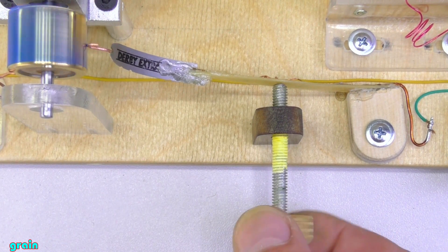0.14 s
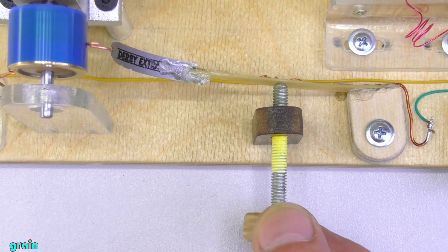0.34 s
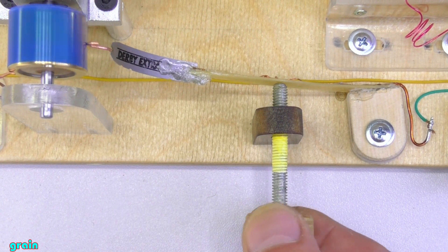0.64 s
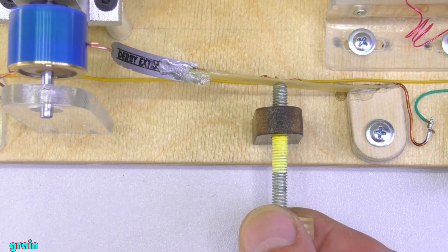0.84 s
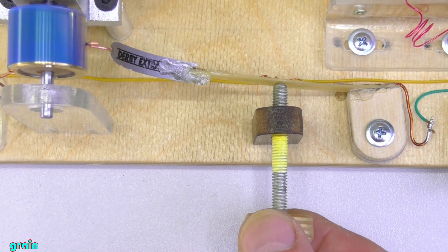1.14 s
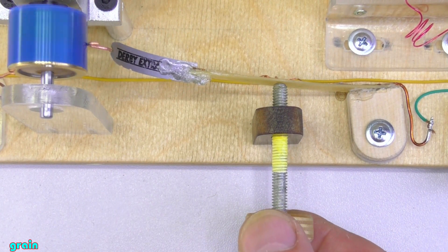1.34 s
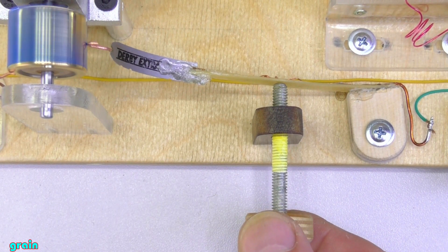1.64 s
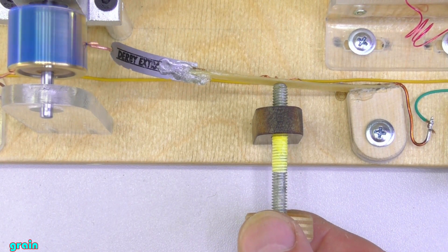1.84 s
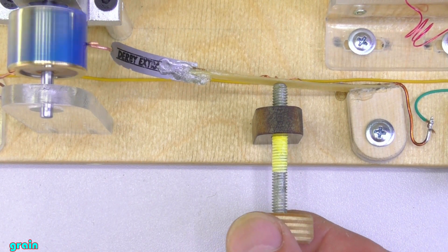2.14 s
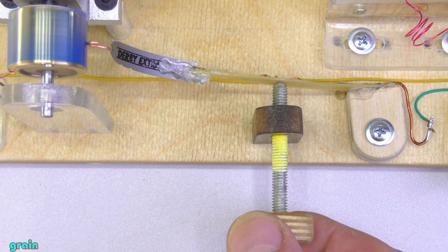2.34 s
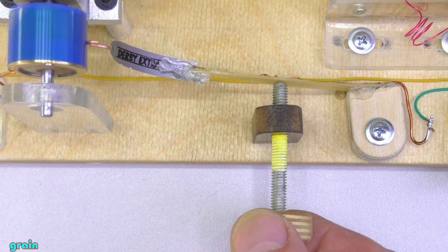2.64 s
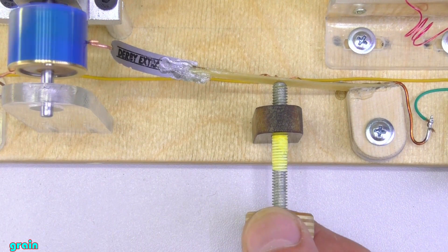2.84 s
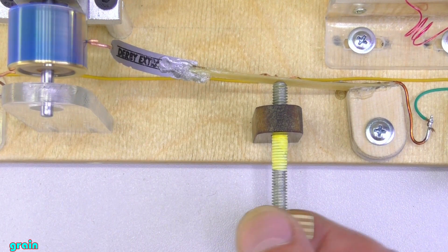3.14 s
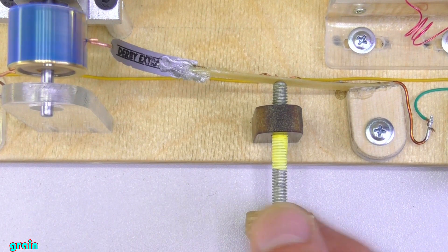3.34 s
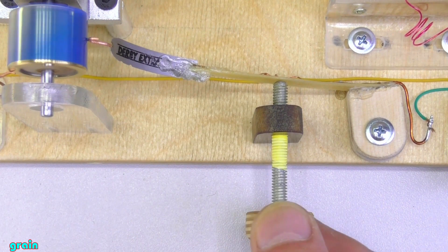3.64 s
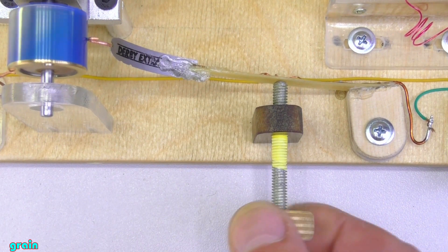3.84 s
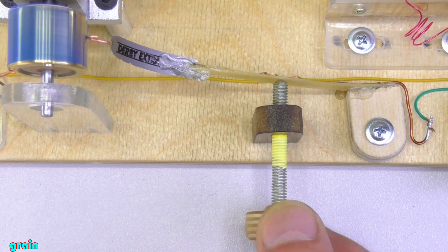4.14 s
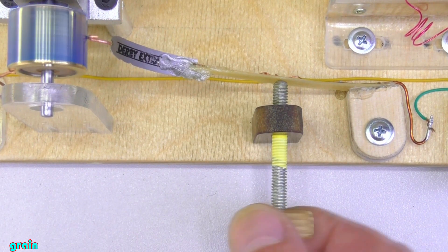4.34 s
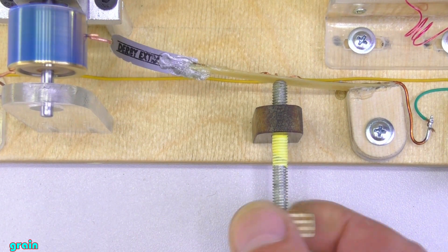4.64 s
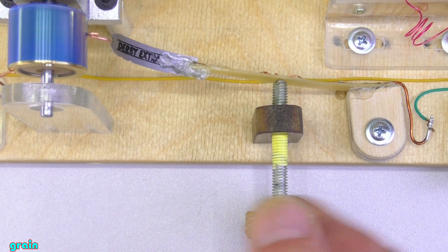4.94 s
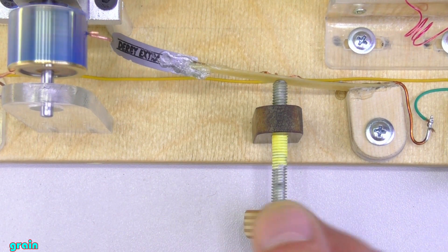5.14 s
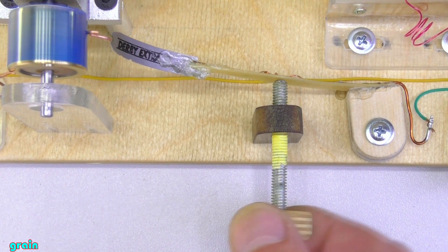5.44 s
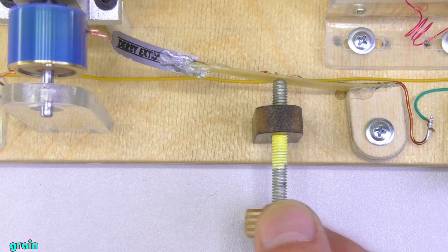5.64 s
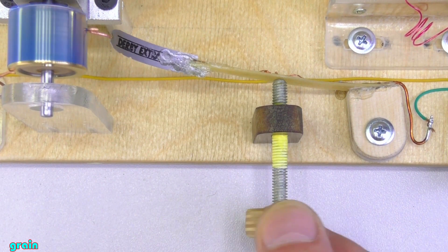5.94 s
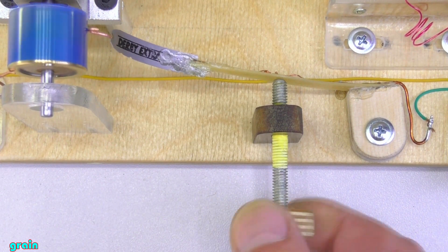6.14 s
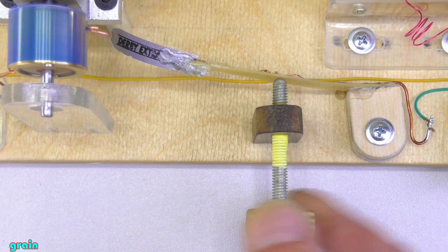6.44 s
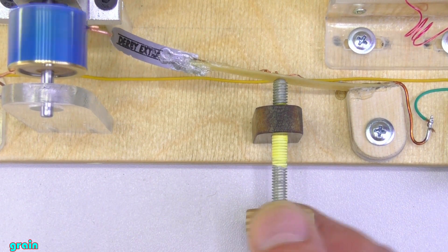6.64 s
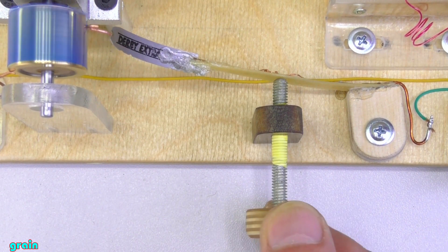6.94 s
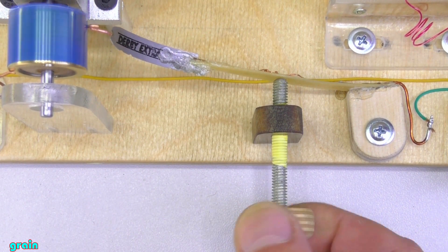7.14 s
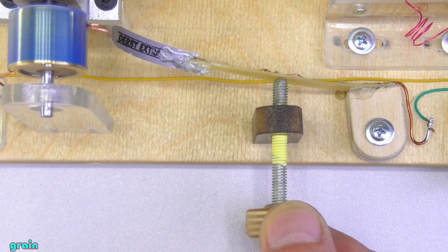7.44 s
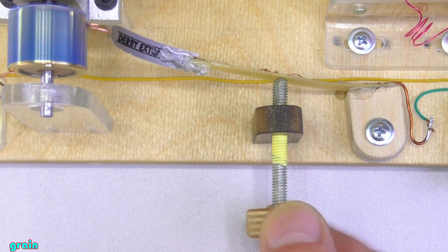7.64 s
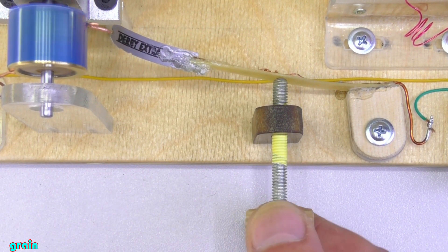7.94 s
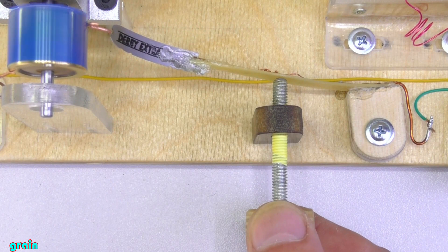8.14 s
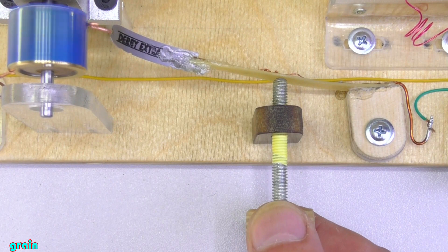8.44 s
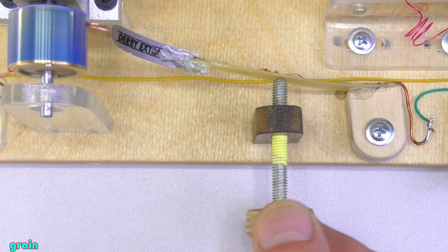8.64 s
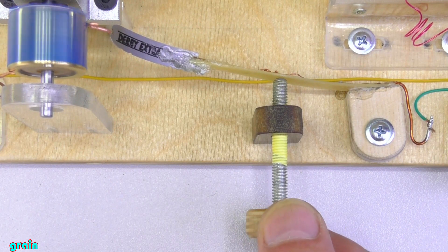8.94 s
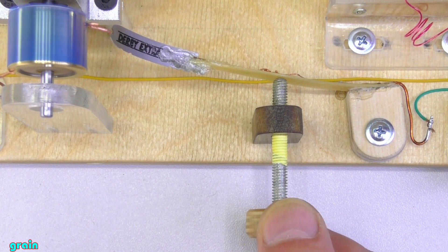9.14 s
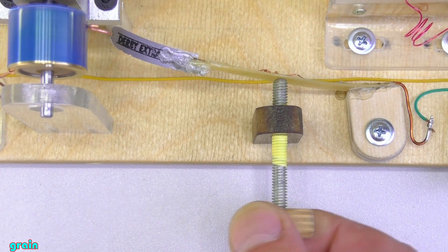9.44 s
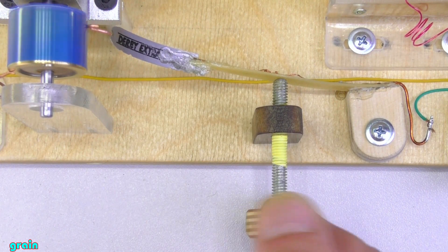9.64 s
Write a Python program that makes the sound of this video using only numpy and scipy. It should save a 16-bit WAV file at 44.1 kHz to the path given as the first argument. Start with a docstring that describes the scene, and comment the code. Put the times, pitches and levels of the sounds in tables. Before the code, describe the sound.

Rapid mechanical clatter from a homemade plunger motor, recorded very near with little room sound. Each turn gives a light linkage tick, a hard bright metal strike and a softer knock back, over woody thumps from the board. The rhythm is unbroken and accelerates smoothly as its contact screw is adjusted, growing denser and more rattly, with a brief metallic singing late on, then holds almost steady at top speed.

```python
"""On a wooden board, close up, a homemade solenoid motor runs while a screw on its contact is turned.
It speeds up from 13 to 19 turns a second. In every turn the linkage takes up its slack, the contact
touches, the plunger strikes home and then knocks back. Each blow is an impact with chatter that rings
the modes of steel, rod, spring, brackets and board. The screw rasps in filtered random clicks;
decaying noise makes the reflections and shaped noise the room tone."""
import sys
import numpy as np
from scipy import signal
from scipy.fft import rfft, irfft
from scipy.io import wavfile
from scipy.ndimage import uniform_filter1d

SR = 44100
rng = np.random.default_rng(int(sys.argv[2]) if len(sys.argv) > 2 else 0)


def int16_out(signal):
    """Quantize to a 16-bit WAV file."""
    q = np.round(np.clip(np.atleast_2d(signal).T, -1, 1) * 32767)
    wavfile.write(sys.argv[1], SR, q.astype(np.int16))


N = 431729


def amp(db):
    """Decibels to gain."""
    return 10 ** (np.asarray(db) / 20)


def unit(x):
    """Scales to an energy of one."""
    return x / np.sqrt(np.sum(x ** 2, -1, keepdims=True) + 1e-20)


def curve(rows, s):
    """Every column of a table at the times s."""
    at, *columns = np.transpose(rows)
    return [np.interp(s, at, column) for column in columns]


def read(points, hz):
    """A spectrum read on a log-frequency axis."""
    point_hz, value = np.transpose(points)
    return np.interp(np.log(hz + 1), np.log(point_hz), value)


def band(x, low_hz, high_hz, order=3):
    """A part radiates only the band that suits its size."""
    sos = signal.butter(order, [low_hz, high_hz], "band", fs=SR, output="sos")
    return signal.sosfilt(sos, x)


def ringing(modes, axis=2, alternate=False):
    """One blow sets decaying modes ringing; alternating signs make them swell before they fade."""
    modes, t = np.array(modes, float), np.arange(SR // 6) / SR
    # axis names the column of mode levels
    hz, width, db = modes[:, :1], modes[:, 1:2], modes[:, axis, None]
    sign = (-1) ** (alternate * np.arange(len(modes)))[:, None]
    decay = np.exp(-np.pi * width * t)
    partials = sign * amp(db) * width * decay * np.sin(2 * np.pi * hz * t)
    return unit(np.sum(partials, 0))


def crack(points):
    """Minimum phase packs a spectrum into the shortest causal click."""
    hz = abs(np.fft.fftfreq(SR // 6, 1 / SR))
    log_gain = np.log(amp(read(points, hz)))
    phase = -signal.hilbert(log_gain).imag
    return unit(np.fft.ifft(np.exp(log_gain + 1j * phase)).real)


def blows(times, level_db, body, chatter_db, chatter_s, alike, spread_db, jitter_s):
    """Each blow is one impact and a dying chatter of rebounds; level_db is rms over 10 ms."""
    t = np.arange(SR // 30) / SR
    habit, fresh = rng.standard_normal((2, len(times), len(t)))
    # the habitual rebound pattern drifts slowly from turn to turn
    habit = uniform_filter1d(habit, size=9, axis=0)
    rebounds = np.array([habit, fresh])
    # cubing leaves a few strong rebounds
    habit, fresh = unit(rebounds ** 3 * np.exp(-t / chatter_s))
    force = amp(chatter_db) * unit(alike * habit + (1 - alike) * fresh)
    force[:, 0] += 1  # the impact itself
    size, slip = rng.standard_normal((len(times), 2)).T
    gain = amp(level_db + spread_db * size)[:, None]
    sounds = unit(signal.fftconvolve(force, body[None], axes=1)) * gain
    # a second of margin at each end catches blows that overhang
    out = np.zeros(N + 2 * SR)
    for s, sound in zip(times + jitter_s * slip, sounds):
        at = round((s + 1) * SR)
        out[at:at + len(sound)] += sound
    return out[SR:SR + N] * np.sqrt(SR / 100)


# pace of the motor: start_s, speed_turns_per_s
MOTOR_SPEED = [(0.0, 13.023), (0.87, 14.039), (1.68, 14.491), (2.87, 14.622), (3.89, 15.125),
               (5.45, 17.126), (6.24, 17.829), (8.23, 19.25), (8.7, 19.355), (9.8, 19.004)]


def speed(s):
    """Turns a second at the times s, gliding between the points of the table."""
    return curve(MOTOR_SPEED, s)[0]


# wait from the strike to the return knock: start_s, delay_s
RETURN_DELAY = [(0, .0158), (2.6, .0153), (4.8, .0166), (6.3, .0182), (8.2, .0186), (9.8, .0182)]


def turns():
    """Adding up the speed gives the times of the slack, the strike and the return in every turn."""
    start_turn, slack_turns = -.566, .295  # the slack is taken up this much of a turn before the strike
    t = np.arange(N) / SR
    angle = start_turn + np.cumsum(speed(t)) / SR
    whole = np.arange(int(angle[-1]) + 1)
    strike = np.interp(whole, angle, t)
    slack = np.interp(whole - slack_turns, angle, t)
    return slack, strike, strike + curve(RETURN_DELAY, strike)[0]


MID_SPEED = 16  # turns a second

# how hard the coil pulls as the screw shifts the contact: start_s, level_db
COIL_PULL = [(0, 1.5), (.4, 0), (.9, 4), (1.45, -1), (2.5, 2.5), (3.5, 1.5), (3.8, 4.5), (4.3, 1),
             (5.25, 3), (5.65, 1), (5.83, 2.5), (6.1, -1.5), (6.8, 1), (7.15, 1.5), (8, -0.5), (8.5, -3.5),
             (9.05, -4.5), (9.7, 0)]


def effort(s, level_db, faster_db, pull_share):
    """A blow's level: base at middle speed, more or less per extra turn a second, a share of the pull."""
    return level_db + faster_db * (speed(s) - MID_SPEED) + pull_share * curve(COIL_PULL, s)[0]


# color of the room tone: pitch_hz, relative level_db (per Hz)
ROOM_TONE = [(10, 6), (50, -2), (90, -8.5), (300, 8.5), (1000, -3.5), (4000, -12), (16000, -9.5)]


def air():
    """Steady noise, shaped in frequency, is the faint room tone."""
    gain = amp(read(ROOM_TONE, np.fft.rfftfreq(N, 1 / SR)))
    noise = irfft(rfft(rng.standard_normal(N)) * gain, N)
    return amp(-44.5) * unit(noise) * np.sqrt(N)


# reverb time across the spectrum: pitch_hz, t60_s
ROOM_DECAY = [(150, 0.087), (600, 0.14), (1700, 1), (5000, 0.061), (10000, 0.18), (16000, 0.14)]


def room(x):
    """Dense reflections, each band dying at its own speed."""
    t = np.arange(SR // 2) / SR
    # silent for 1.5 ms, then fading in by 3 ms
    taps = rng.standard_normal(len(t)) * np.clip(t / 0.0015 - 1, 0, 1)
    hz, s, z = signal.stft(taps, SR, nperseg=256)
    decay = amp(-60 * s / read(ROOM_DECAY, hz)[:, None])
    tail = signal.istft(z * decay, SR)[1]
    return signal.fftconvolve(x, unit(tail))[:N]


def bench(x):
    """Quick reflections off the parts nearby, a noise burst that dies within milliseconds."""
    t = np.arange(SR // 50) / SR
    taps = rng.standard_normal(len(t)) * np.exp(-t / 0.0011)
    return signal.fftconvolve(x, unit(taps))[:N]


# rasps of the screw as it is turned: center_s, length_s, level_db
SCREW_TWISTS = [(2.802, 0.24, -54), (4.33, .2, -49), (5.5, 0.41, -50)]


def screw():
    """Tiny slips of the thread in its wooden block, swelling with each twist."""
    t = np.arange(N) / SR
    slipping = rng.random(N) < 900 / SR  # about 900 slips a second
    slips = band(rng.standard_normal(N) ** 3 * slipping, 2060, 3300)
    slips = unit(slips) * np.sqrt(N)
    return slips * sum(amp(db) * np.exp(-(2 * (t - s) / length) ** 2) for s, length, db in SCREW_TWISTS)


def sympathy(s, centre_speed, width_speed, extra_db):
    """Resonance lifts a blow while the motor runs near a part's own speed, in turns a second."""
    return extra_db * np.exp(-((speed(s) - centre_speed) / width_speed) ** 2)


def lag(s, delay_s, faster_s):
    """The board answers late: delay_s at middle speed, faster_s more for each extra turn a second."""
    return delay_s + faster_s * (speed(s) - MID_SPEED)


# modes of the wooden board: pitch_hz, width_hz, strike level_db, return level_db (relative)
BOARD_MODES = [(117.2, 4.7, 11, -4), (140, 7.4, -21, 2), (173.2, 13.3, -2.5, 2.5), (212.5, 14, -23, 1),
               (251.2, 23.4, -26, 13), (269.6, 17, 14.5, -6.5), (331.7, 19.2, 15, 2), (342.2, 7.4, 3, 4),
               (388, 6.7, -3, 1)]


def board(slack, strike, back):
    """Recoil gives the board three pushes a turn, and it rocks in its deepest modes."""
    strike_db = effort(strike, level_db=-25.5, faster_db=-0.32, pull_share=0.66)
    strike_db += sympathy(strike, centre_speed=16.66, width_speed=0.99, extra_db=3.5)
    back_db = effort(strike, level_db=-27.5, faster_db=0.83, pull_share=0.87)
    slack_db = effort(strike, level_db=-32.0, faster_db=2.5, pull_share=2.07)
    sway_db = effort(strike, level_db=-40.0, faster_db=0.6, pull_share=0.28)
    sway_db += sympathy(strike, centre_speed=14.6, width_speed=0.77, extra_db=7.1)
    pulled = band(ringing(BOARD_MODES), 129, 393, order=2)
    released = band(ringing(BOARD_MODES, axis=3), 140.4, 398, order=2)
    strike_push = blows(strike + lag(strike, 0.00362, 0.00064), strike_db, pulled, chatter_db=-10,
                        chatter_s=0.0088, alike=.5, spread_db=1.43, jitter_s=.00003)
    return_push = blows(back + lag(strike, 0.0061, .00006), back_db, released, chatter_db=-13.5,
                        chatter_s=0.0027, alike=.5, spread_db=1.0, jitter_s=.00005)
    slack_push = blows(slack + lag(strike, 0.00637, 0.00064), slack_db, released, chatter_db=-8,
                       chatter_s=0.0037, alike=.5, spread_db=1.0, jitter_s=.0001)
    sway = blows(back, sway_db, band(released, 101.0, 165.4), chatter_db=-3,
                 chatter_s=0.0031, alike=0.48, spread_db=0.0, jitter_s=0.00031)
    return strike_push + return_push + slack_push + sway


# bracket modes: pitch_hz, width_hz, strike level_db, return level_db, slack level_db (relative)
BRACKET_MODES = [(521.5, 14.2, 4.5, 0.5, 13), (567.5, 32.9, 10, 4, 20), (569.9, 32.6, 9.6, 6, 20),
                 (646.7, 52, -5.5, -1, -4.5), (699.6, 11.1, 6.5, -5.5, 6), (751, 28, 2, -11, 1.5)]
# how hard the brackets are shaken: start_s, strike level_db, return level_db, slack level_db
BRACKET_SHAKE = [(0.0, -40.5, -41, -42), (1.05, -41, -41, -38.29), (1.3, -42.5, -42.5, -36),
                 (3.4, -41, -40.32, -35.5), (4.3, -39.5, -38, -35.02), (5.5, -37, -36.5, -36.03),
                 (6.8, -35.5, -38.5, -36.5), (7.15, -32.7, -36.44, -35), (7.95, -32.5, -38, -39),
                 (8.2, -38.5, -37.4, -34), (9.45, -32, -40.5, -39.89), (9.7, -31, -40.69, -34)]
# bracket timing against each blow, negative is early: start_s, strike offset_s, return offset_s, slack offset_s
BRACKET_OFFSET = [(0.0, -0.005, -0.00033, 0.0022), (1.3, -0.00086, -0.00066, 0.001),
                  (3.4, 0.0027, -0.0014, 0.0007), (4.3, -0.00085, -0.00105, 1e-05),
                  (5.5, -0.0077, -0.008, -0.0035), (6.5, -0.0074, 0.000017, -0.0034),
                  (7.3, -0.0037, -0.00075, 0.00022), (8.3, -0.0013, 0.0032, -0.0013),
                  (9.7, -0.0093, -0.0049, -0.00023)]


def brackets(slack, strike, back):
    """Brackets on the board ring, swelling and fading, around the strike, the return and the slack."""
    out = np.zeros(N)
    levels, offsets = curve(BRACKET_SHAKE, strike), curve(BRACKET_OFFSET, strike)
    for k, (s, db, offset) in enumerate(zip((strike, back, slack), levels, offsets)):
        body = band(ringing(BRACKET_MODES, axis=2 + k, alternate=True), 508, 761)
        out += blows(s + offset, db, body, chatter_db=-7.5, chatter_s=0.0069, alike=0.31,
                     spread_db=1, jitter_s=.00003)
    return out


# modes of the coil mount: pitch_hz, width_hz, relative level_db
MOUNT_MODES = [(953, 45, -1), (1009, 39, -2), (1130, 58, -11.5)]


def coil_mount(strike):
    """The coil mount clacks at about 1 kHz, starting just ahead of the strike."""
    clack_db = effort(strike, level_db=-43.5, faster_db=0.04, pull_share=0.61)
    return blows(strike - .002, clack_db, band(ringing(MOUNT_MODES), 898, 1146), chatter_db=3,
                 chatter_s=0.025, alike=0.52, spread_db=1, jitter_s=.0001)


# modes of the contact spring: pitch_hz, width_hz, relative level_db
SPRING_MODES = [(3560, 22, -6.5), (4600, 22, -3.5), (8426, 22.4, 9), (9100, 25, -7), (8590, 32, 2.5)]


def spring(strike):
    """The contact spring pings as it flies free just after the strike."""
    # it rings freely up to free_speed (turns a second), then loses damping_db per turn a second more
    free_speed, damping_db = 13.3, 3
    ping_db = effort(strike, level_db=-26.0, faster_db=1.5, pull_share=0.62)
    ping_db -= damping_db * np.maximum(speed(strike) - free_speed, 0)
    return blows(strike + .005, ping_db, ringing(SPRING_MODES), chatter_db=-20.5,
                 chatter_s=0.016, alike=0.23, spread_db=1.5, jitter_s=.0003)


# modes of the linkage: pitch_hz, width_hz, struck home level_db, knocked loose level_db (relative)
LINK_MODES = [(1390, 150, 5, -2), (1471, 72, 5.5, -4), (1660.5, 33, 4, 3), (1698, 58, 13, 7.5),
              (1769, 37, -1.5, -3.5), (2053, 43, 13.5, 5.5)]
# the note of the rod: pitch_hz, width_hz, relative level_db
ROD_MODES = [(1693, 12.6, -4), (1733, 40, -5.5)]
# how strongly the rod sings, before each layer's trim: start_s, level_db
ROD_SINGING = [(3, -34.5), (5.3, -34.5), (7.2, -41), (7.6, -32.5), (8.1, -25.5), (8.45, -29.5), (9.2, -30),
               (9.45, -39)]


def linkage(slack, strike, back):
    """The loose rod clacks three times a turn, and sings when the blows keep it ringing."""
    slack_db = effort(strike, level_db=-36.5, faster_db=1.67, pull_share=1.0)
    strike_db = effort(strike, level_db=-32, faster_db=-2.0, pull_share=0.26)
    back_db = effort(strike, level_db=-38.5, faster_db=1.24, pull_share=0.64)
    sing_db, = curve(ROD_SINGING, strike)
    tight = band(ringing(LINK_MODES), 1366, 1840)
    loose = band(ringing(LINK_MODES, axis=3), 1414, 1974)
    note = band(ringing(ROD_MODES), 1560, 1816, order=2)
    taken_up = blows(slack, slack_db, loose, chatter_db=3.0, chatter_s=0.024, alike=0.058,
                     spread_db=1, jitter_s=0.00024)
    struck = blows(strike - .0008, strike_db, tight, chatter_db=-5.0, chatter_s=0.011, alike=0.18,
                   spread_db=2.0, jitter_s=.00005)
    dropped = blows(back - .002, back_db, loose, chatter_db=1.5, chatter_s=0.0047, alike=0.28,
                    spread_db=1.1, jitter_s=0.00023)
    sung_back = blows(back - .0036, sing_db + 1, note, chatter_db=-7.5, chatter_s=0.011, alike=0.46,
                      spread_db=0.0, jitter_s=.00008)
    sung_slack = blows(slack + 0.002036, sing_db - 4.5, note, chatter_db=-6.5, chatter_s=0.009,
                       alike=0.92, spread_db=1, jitter_s=0.00019)
    return taken_up + struck + dropped + sung_back + sung_slack


# modes of plunger and coil housing: pitch_hz, width_hz, strike level_db, return level_db (relative)
STEEL_MODES = [(2513, 64, -13, -11), (2723, 46, -8, -10), (3204, 48, -14, -2), (3530, 61, -6, -7),
               (3822, 177, -5, 1.5), (4144, 53, -8, -3.5), (4500, 133, -10.5, -1.5), (5290, 120, -11, -7.5),
               (5983, 120, -7.5, -2), (6290, 100, -3, -4.5), (7620, 160, 0, 4), (8180, 140, -7.5, -3),
               (9090, 110, -9, -1), (9902, 102, 8, 8.5), (10170, 126, 7, 3.5), (10200, 53, -6.5, 1),
               (11130, 86, 0, 4), (11590, 156, 6, -1.5), (12000, 60, -1, -4), (12290, 116, 0.5, -4.5),
               (12900, 130, -9, -10), (14900, 120, -3.5, -3), (15030, 170, -3.5, -3)]
# the crack of steel on steel: pitch_hz, relative level_db (per Hz)
STEEL_CRACK = [(250, -51), (1000, -43), (2300, -17.5), (2900, -6.5), (3800, 2.5), (5000, -16.5),
               (6700, -6.5), (7700, 2.5), (9400, -3), (11600, 9), (13200, -4.5), (14200, -5), (16500, -8.5)]
# how hard the plunger knocks on its way back, before each layer's trim: start_s, level_db
RETURN_KNOCK = [(0, -36), (.5, -48), (.95, -33), (1.5, -40), (2.4, -33.5), (3.55, -33), (3.8, -27),
                (4, -28), (4.2, -34.5), (4.55, -27.5), (5.1, -29), (5.6, -27), (7.1, -27), (8.2, -29.5),
                (8.8, -32), (9.7, -28)]
# screw settings where the plunger hits once more a turn: start_s, end_s, offset from the strike_s (negative is
# before it), level_db
MORE_HITS = [(3.65, 4.4, 0.035, -37), (6.1, 7.4, 0.0096, -29), (6.1, 8.8, 0.0015, -35),
             (8.5, 9.8, .005, -29.5), (6.0, 9.8, -0.012, -47.5)]


def plunger(slack, strike, back):
    """A light touch, the hard strike with its rebounds, and a looser knock on the way back."""
    strike_db = effort(strike, level_db=-25.0, faster_db=-0.08, pull_share=0.58)
    back_db, = curve(RETURN_KNOCK, strike)
    click = crack(STEEL_CRACK)
    hard = band(ringing(STEEL_MODES) + amp(0.5) * click, 890, 21950, order=2)
    soft = band(ringing(STEEL_MODES, axis=3) + amp(-3) * click, 1800, 18000, order=2)
    touch = blows(strike - .0033, strike_db - 12, soft, chatter_db=9, chatter_s=.0018, alike=.2,
                  spread_db=1, jitter_s=.0001)
    bump = blows(strike - .0021, strike_db - 14.5, band(soft, 1780, 7700), chatter_db=-1.5,
                 chatter_s=0.00063, alike=0.55, spread_db=0, jitter_s=.0002)
    extra = np.zeros(N)
    for start, end, delay, db in MORE_HITS:
        chosen = strike[(strike > start) & (strike < end)]
        extra += blows(chosen + delay, db, hard, chatter_db=4, chatter_s=0.0014, alike=0.58,
                       spread_db=1.5, jitter_s=.0002)
    home = blows(strike, strike_db - .4, hard, chatter_db=.5, chatter_s=.003, alike=.4,
                 spread_db=.4, jitter_s=0)
    # a faster plunger lands more loosely and buzzes on for a moment
    buzz_db = effort(strike, level_db=-46.5, faster_db=1.8, pull_share=0.93)
    buzz = blows(strike + 0.0011, buzz_db, band(soft, 10230, 10960), chatter_db=1, chatter_s=0.007,
                 alike=.1, spread_db=2, jitter_s=.0001)
    # the plunger grazes its sleeve just before it knocks back, and rubs in it while it slides
    graze = blows(back - .003, back_db - 6, soft, chatter_db=20, chatter_s=.005, alike=.5,
                  spread_db=1, jitter_s=.0005)
    knock = blows(back, back_db - 3, soft, chatter_db=10, chatter_s=.002, alike=.55,
                  spread_db=1, jitter_s=.0004)
    rub = blows(slack, back_db - 11.5, soft, chatter_db=27, chatter_s=0.01, alike=0.07,
                spread_db=0.5, jitter_s=0.00033)
    # the singing rod makes the coil housing chatter
    housing_db = curve(ROD_SINGING, strike)[0] - 7
    housing = blows(back - .003, housing_db, band(soft, 3500, 3870), chatter_db=1, chatter_s=0.0027,
                    alike=0.54, spread_db=0, jitter_s=0.00038)
    return touch + bump + extra + home + buzz + graze + knock + rub + housing


def scene():
    """The motor sits in the middle; only its reflections and the room tone spread to the sides."""
    slack, strike, back = turns()
    thump = board(slack, strike, back)
    rattle = brackets(slack, strike, back) + coil_mount(strike)
    rod = linkage(slack, strike, back)
    steel = plunger(slack, strike, back)
    mid = air() + screw() + thump + rattle + spring(strike) + rod + steel
    # the board is close: little of its thump comes back from the room
    mid_send = amp(-14.0) * steel + amp(-18.5) * rod + amp(-9.5) * rattle + amp(-18) * thump
    mid = mid + room(mid_send)
    side_send = amp(-47) * steel + amp(-25.5) * rod + amp(-10) * rattle
    # the nearby parts throw some bands of the steel sideways more strongly
    bench_send = amp(-30) * steel + amp(-16) * rod + amp(-16) * rattle
    bench_send += amp(-9.0) * band(steel, 2030, 3060)
    bench_send += amp(-13.5) * band(steel, 3730, 5000)
    bench_send += amp(-18) * band(steel, 11800, 15700)
    side = room(side_send) + amp(-15.5) * air() + bench(bench_send)
    return np.array([mid + side, mid - side])


def record(dry):
    """A steep lowpass ends the treble at its edge."""
    edge_hz = 16100
    lowpass = signal.firwin(401, edge_hz, window=("kaiser", 9), fs=SR)
    return signal.oaconvolve(dry, lowpass[None], "same")


dry = scene()
out = record(dry)
int16_out(out)
```